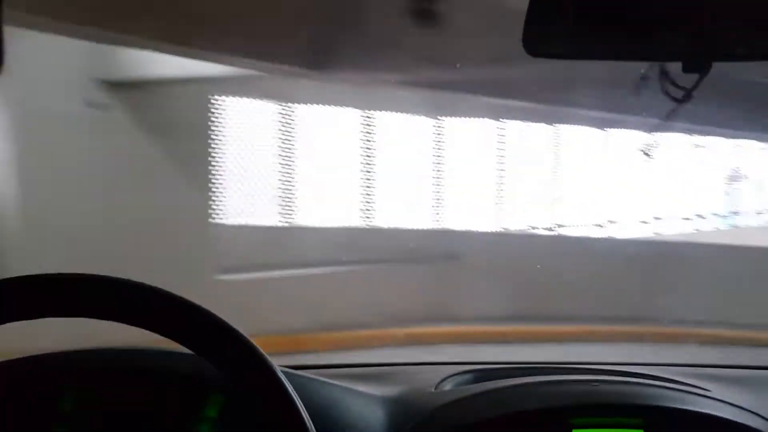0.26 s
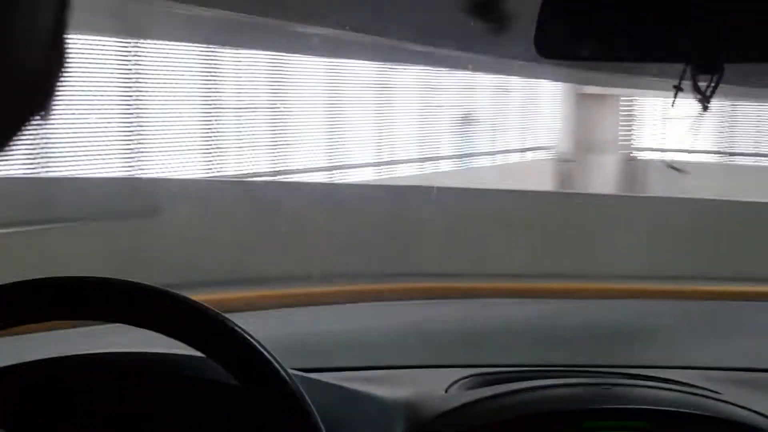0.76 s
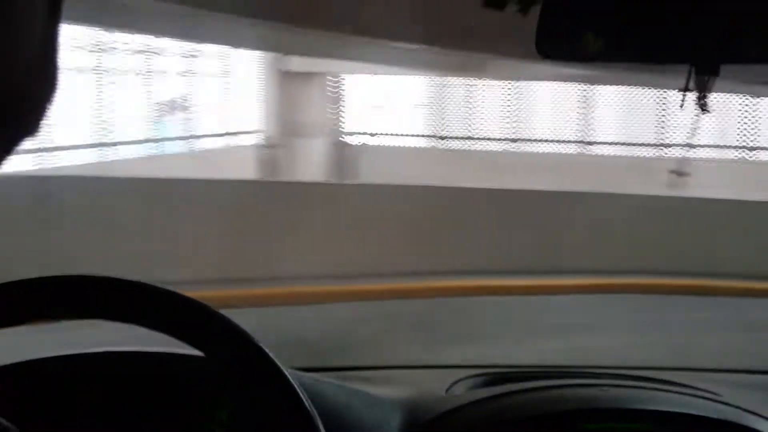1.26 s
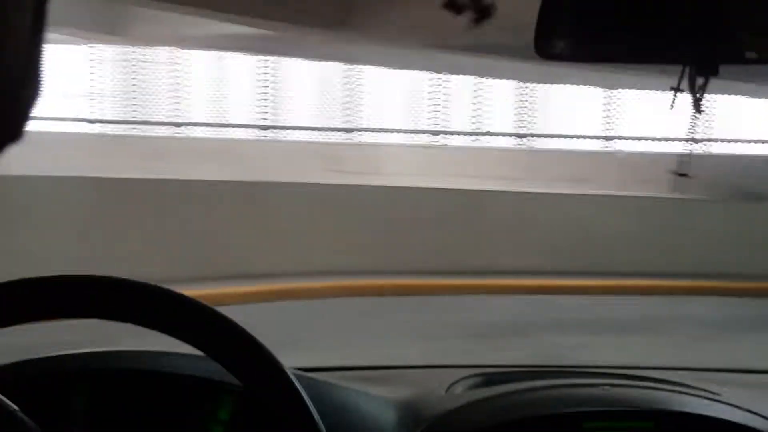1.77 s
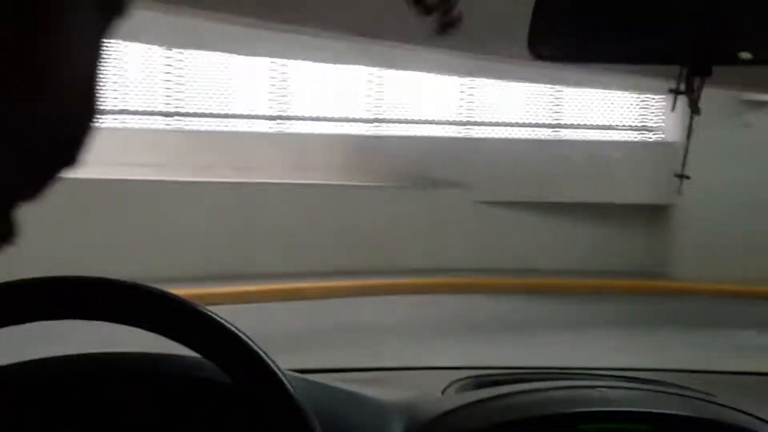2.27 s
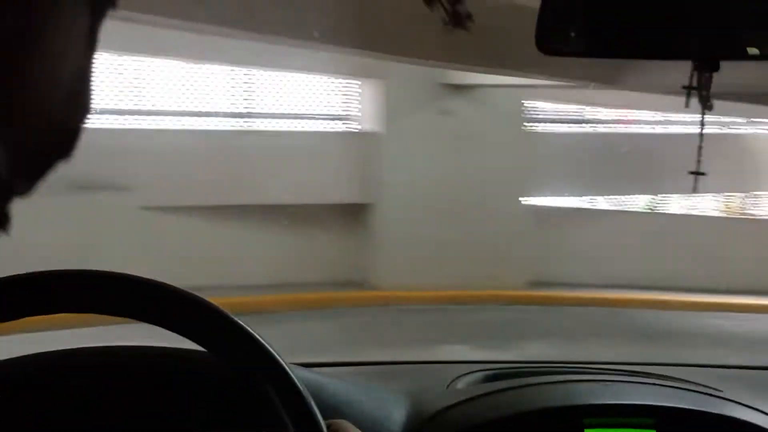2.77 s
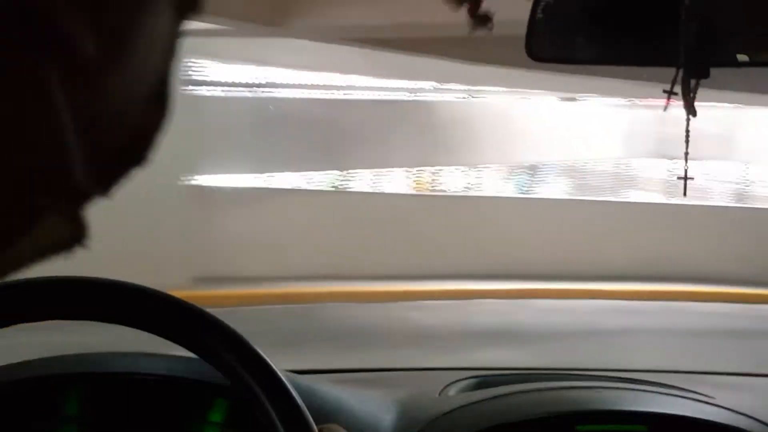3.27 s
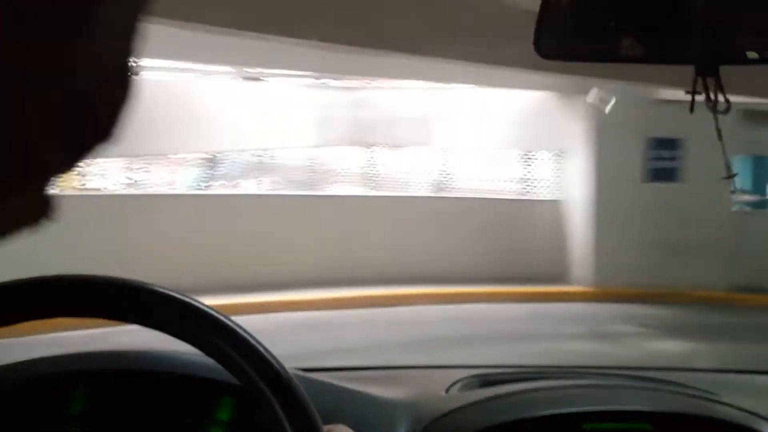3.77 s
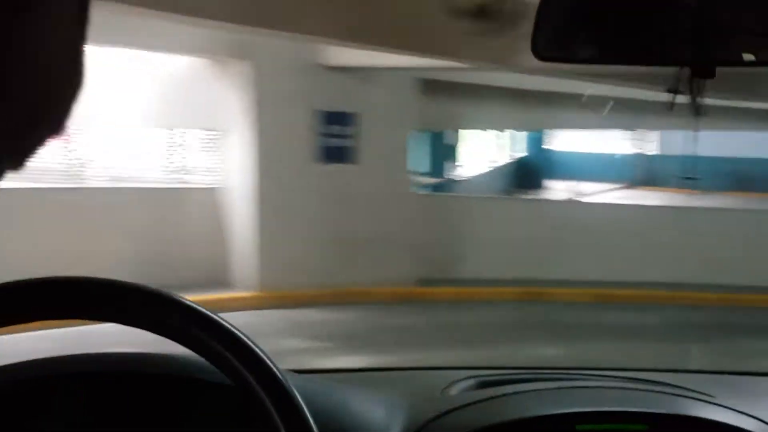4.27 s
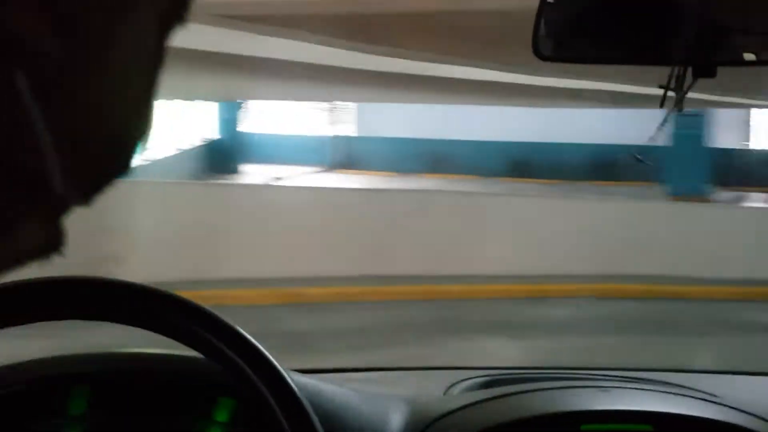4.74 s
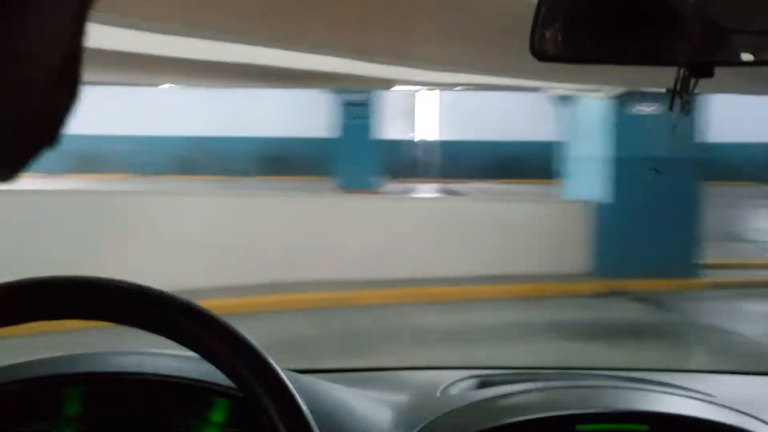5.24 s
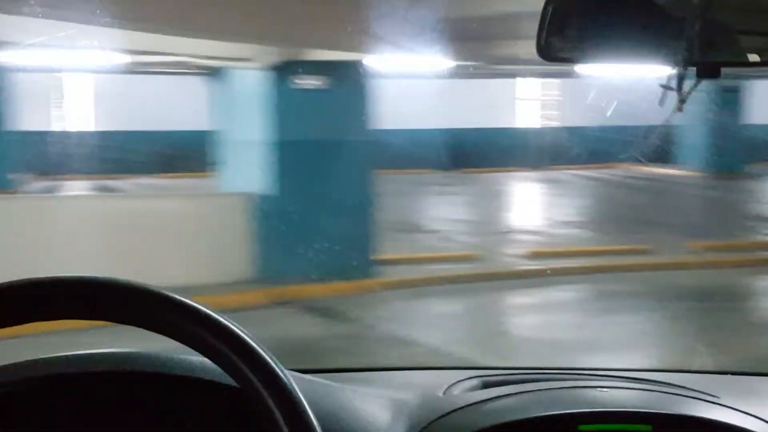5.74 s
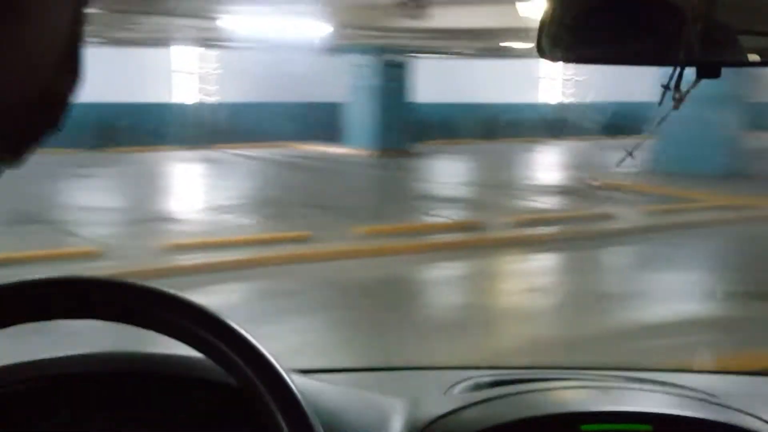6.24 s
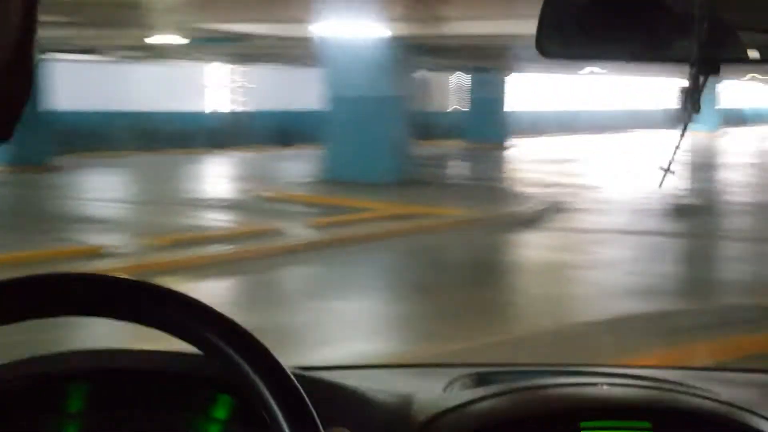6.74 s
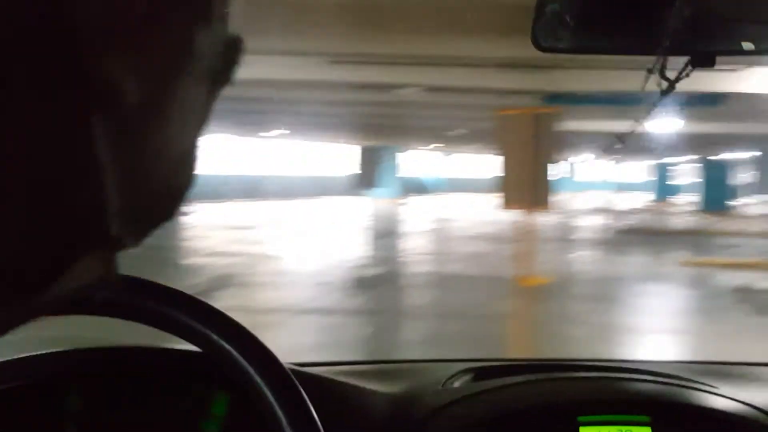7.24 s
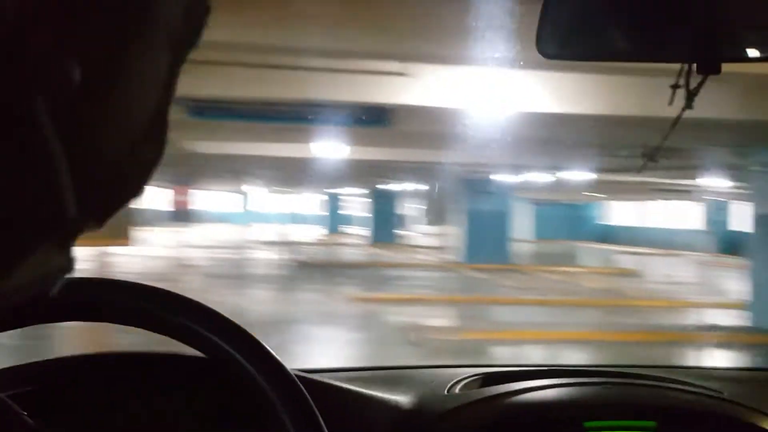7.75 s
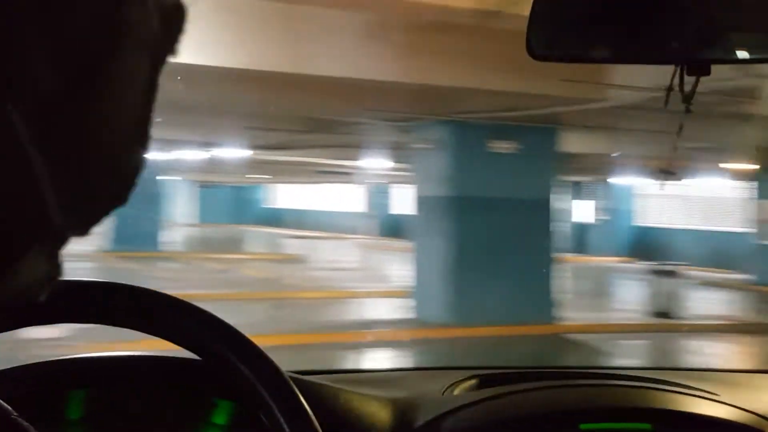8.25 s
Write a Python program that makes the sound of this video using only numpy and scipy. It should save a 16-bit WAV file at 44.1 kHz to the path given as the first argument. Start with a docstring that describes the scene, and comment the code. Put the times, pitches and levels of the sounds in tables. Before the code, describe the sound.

Deep muffled road rumble fills a small car cabin, with floor-joint thuds, tiny pendant ticks, plastic knocks and a brief faint key jingle.

```python
"""Heard from the back seat, a car rolls slowly through a concrete parking garage; its tyres boom throughout.
At first floor joints thud and loose trim knocks; the whine of an engine-driven pump dips soon after.
Then bumps rock the car, a pendant on the mirror ticks, and trim rattles and creaks in the small cabin.
Late on come harder jolts and knocks, and keys jingle; the boom is weakest at the very end.
Noise makes the road, rattles and knocks; sine waves make the engine, low notes and ringing parts."""
import sys
import numpy as np
from scipy import signal
from scipy.fft import rfft, irfft, next_fast_len
from scipy.io import wavfile
from scipy.ndimage import uniform_filter1d

SR = 44100
rng = np.random.default_rng(int(sys.argv[2]) if len(sys.argv) > 2 else 0)


def pcm_store(signal):
    """Save signal as 16-bit PCM."""
    levels = np.round(np.clip(np.atleast_2d(signal), -1, 1) * 32767)
    wavfile.write(sys.argv[1], SR, levels.astype(np.int16).T)


N = 375291
TIME = np.arange(N) / SR
TAIL = TIME[:SR // 2]  # the half second given to each short sound


def undb(db):
    """Turn decibels into gain."""
    return 10 ** (np.asarray(db) / 20)


def unit(x):
    """Scale to rms 1."""
    return x / np.sqrt(np.mean(x ** 2))


def unit_hit(x):
    """Scale a blow to rms 1 over its first fortieth of a second."""
    return x / np.sqrt(np.mean(x[..., :SR // 40] ** 2))


def curves(table):
    """Draw each column of a table, after its times, as a line through every sample."""
    times, *columns = np.transpose(table)
    return [np.interp(TIME, times, column) for column in columns]


def walk(rate):
    """Wander at random: levels held for 1 / rate seconds, smoothed twice and scaled to about rms 1."""
    hold = int(SR / rate)
    steps = np.repeat(rng.standard_normal(N // hold + 1), hold)
    smooth = uniform_filter1d(uniform_filter1d(steps, hold), hold)
    return unit(smooth[:N])


def hump(s, half):
    """Swell smoothly to 1 and back around a time; half is the bell's standard deviation in seconds."""
    return np.exp(-.5 * ((TIME - s) / half) ** 2)


def even(x, span_s=.11):
    """Even out a noise's chance swells, so that the road decides when it surges."""
    power = uniform_filter1d(np.mean(x ** 2, axis=0), int(span_s * SR))
    return unit(x / np.sqrt(power))


def colour(x, points):
    """Filter by a spectrum of (f/Hz, level/dB) points that falls 30 dB an octave beyond its ends."""
    hz, db = np.transpose(points)
    octave = np.log2(np.fft.rfftfreq(x.shape[-1], 1 / SR) + 1)
    known = np.log2(hz)
    beyond = np.abs(octave - np.clip(octave, known[0], known[-1]))
    gain = undb(np.interp(octave, known, db) - 30 * beyond)
    return irfft(rfft(x) * gain, x.shape[-1])


# Directions from which sound reaches the left and right ports
# columns: delay of the left port/ms, level/dB
ARRIVAL_DIRECTIONS = [(0.425, -4.5), (0.254, -3), (0.059, -4), (-0.165, -4), (-0.366, -4.5)]


def cabin_noise(size, apart_db=-14):
    """Make noise from several directions: alike at both ports in the bass, unlike in the treble."""
    n = next_fast_len(size, True)
    hz = np.fft.rfftfreq(n, 1 / SR)
    ports = undb(apart_db) * rfft(rng.standard_normal((2, n)))  # a part that the ports do not share
    for lag_ms, db in ARRIVAL_DIRECTIONS:
        right = undb(db) * rfft(rng.standard_normal(n))
        left = right * np.exp(-2j * np.pi * hz * lag_ms / 1000)
        ports = ports + np.array([left, right])
    return unit(irfft(ports, n))


def rush(points, size=N):
    """Give cabin noise a spectrum and scale it to rms 1."""
    return unit(colour(cabin_noise(size), points)[:, :size])


def fade(t60):
    """Die away by 60 dB in t60 seconds."""
    return np.exp(-np.log(1000) * TAIL / t60)


CABIN_T60_S = 0.19  # how long the cabin takes to die away by 60 dB


def blow(direct, direct_t60):
    """Shape a contact: a quick onset and direct sound, over the cabin's own decay."""
    onset = 1 - np.exp(-TAIL / 0.00044)
    return (fade(CABIN_T60_S) + direct * fade(direct_t60)) * onset


def add(out, s, x):
    """Mix a sound in at a time in seconds."""
    start = int(s * SR)
    first, last = max(start, 0), min(start + x.shape[-1], N)
    out[:, first:last] += x[:, first - start:last - start]


CRACK_T60_S = 0.0088  # extra crack at the start of a struck part


def ringing(strikes, modes, spread_s=0.000253, crack=0, vary_db=0, detune=0):
    """Ring a struck object's modes, each a little apart at the ports, varied at random if asked."""
    out = np.zeros((2, N))
    onset = 1 - np.exp(-TAIL / 0.0004)
    for s, db in strikes:
        ring = 0
        for hz, mode_db, t60 in modes:
            lag = spread_s * rng.uniform(-1.13, 1) * np.array([[1], [-1]])
            weight, shift = rng.standard_normal(2)
            envelope = undb(mode_db + vary_db * weight) * (fade(t60) + crack * fade(CRACK_T60_S))
            cycles = hz * (1 + detune * shift) * (TAIL + lag) + rng.random()
            ring = ring + envelope * np.sin(2 * np.pi * cycles)
        add(out, s, undb(db) * unit_hit(ring * onset))
    return out


# Early reflections off the glass and roof
# columns: delay/s, gain (no unit)
EARLY_REFLECTIONS = [(.0029, .15), (.0047, -.13), (.0079, .13), (.0127, .12)]


def cabin(x):
    """Add close reflections, which overlap the sound and strengthen or weaken fixed pitches."""
    out = x.copy()
    for delay, gain in EARLY_REFLECTIONS:
        add(out, delay, gain * x)
    return out / np.sqrt(1 + sum(gain ** 2 for _, gain in EARLY_REFLECTIONS))


def scuffs(rattle_db, level_db=-8):
    """Rub small trim parts together: three bands of noise that follow the level of the rattle."""
    out = 0
    for hz in (1500, 2100, 3000):
        out = out + rush([(hz / 1.2, 0), (hz * 1.2, 0)])
    return unit(out) * undb(rattle_db + level_db)


# Spectrum of the fine rattle
# columns: f/Hz, level/dB per Hz
RATTLE_SPECTRUM = [(820, 1.5), (1400, -0.5), (1780, -8), (1970, -4.5), (2250, -8), (3260, -7.5),
                   (3570, -12), (5900, -19.5), (7510, -21), (10300, -31), (11300, -33.5), (15500, -27.5)]


def rattle(rattle_db, level_db=1.5, per_second=70, spread_db=3.6, smooth=0.58):
    """Rattle dashboard and doors by many small random contacts, each dying away in the cabin."""
    chance = rng.random(N)
    size = np.minimum(rng.exponential(size=N), 3)
    contacts = (chance < per_second / SR) * undb(spread_db * size)
    power = signal.fftconvolve(contacts ** 2, blow(0.39, 0.0049) ** 2)[:N]
    grain = np.sqrt(smooth + np.abs(power) / power.mean())  # smooth: a steady share between contacts
    return rush(RATTLE_SPECTRUM) * grain * undb(rattle_db + level_db)


# Seats and trim creaking as the body twists
# columns: t/s of the middle, level/dB, centre f/Hz, half length/s
CREAK_TIMES = [(0.162, -49, 2200, 0.023), (0.686, -47, 3100, 0.022), (0.845, -52.5, 2400, 0.013),
               (0.916, -53.5, 2500, .012), (3.577, -56.5, 1970, .02), (4.473, -55.5, 2600, 0.012),
               (4.655, -54, 2800, .015), (5.325, -52.5, 2500, .018), (5.744, -58, 1900, .018),
               (4.588, -57, 1510, .02), (4.799, -58, 2940, 0.011), (4.895, -59, 2370, 0.018),
               (5.83, -52.5, 2080, .02), (5.98, -56, 2050, .02), (6.164, -52.5, 1893, 0.014),
               (6.217, -50.5, 2830, 0.02), (6.67, -46, 2000, 0.023), (6.77, -55, 2605, .02),
               (6.826, -48, 2800, 0.023), (7.381, -50.5, 1880, 0.053), (7.483, -45, 1630, 0.031),
               (7.543, -44, 1500, 0.016), (7.742, -48.5, 2300, .015)]


def creaks(slips_per_second=260, width_octaves=0.33, slip_t60=0.028):
    """Creak by surfaces slipping in quick irregular steps through a broad resonance that swells and fades."""
    out, middle = np.zeros((2, N)), TAIL[-1] / 2
    for s, db, hz, half in CREAK_TIMES:
        slips = (rng.random(len(TAIL)) < slips_per_second / SR) * rng.exponential(size=len(TAIL))
        grain = np.sqrt(np.abs(signal.fftconvolve(slips, fade(slip_t60))[:len(TAIL)]))
        resonance = [(hz * 2 ** (k * width_octaves), -6 * abs(k)) for k in (-2, 0, 2)]
        swell = np.exp(-.5 * ((TAIL - middle) / half) ** 2)
        creak = undb(db) * swell * unit(grain * rush(resonance, size=len(TAIL)))
        add(out, s - middle, creak)
    return out


# Keys swinging together
# columns: t/s, level/dB
KEY_JINGLES = [(6.637, -69), (6.655, -60), (7.322, -59)]
# Notes in the ring of the keys
# columns: f/Hz, level/dB, 60 dB decay/s
KEY_MODES = [(9860, -20, .1), (10950, -17, 0.15), (12710, -7, .17), (13820, -9, .09), (14240, -1, 0.15),
             (14720, -9, .08)]
# Single keys touched lightly, one note each
# columns: t/s, level/dB, f/Hz
KEY_PINGS = [(6.637, -60, 8610), (7.324, -66, 5670), (7.47, -64, 8600)]


def keys(ping_t60_s=.38):
    """Jingle the keys as sets of high, short notes, with longer single pings."""
    out = ringing(KEY_JINGLES, KEY_MODES)
    for s, db, hz in KEY_PINGS:
        out = out + ringing([(s, db)], [(hz, 0, ping_t60_s)])
    return out


# The pendant tapping
# columns: t/s, click level/dB, ring level against the click/dB
PENDANT_TICKS = [(1.315, -65, -12), (1.688, -60.5, 5.5), (2.0183, -71, -7), (2.2939, -63, 4),
                 (2.329, -63, -2), (2.496, -60, 2.5), (2.681, -68, -8), (2.7877, -66, -6),
                 (2.9408, -46.5, 0.5), (3.087, -58.5, 1.5), (3.2227, -55.5, 0), (3.309, -62.5, 7),
                 (3.685, -58.5, 0), (3.761, -62, -5), (5.402, -62, 6.5), (5.529, -63, 1), (5.587, -67, 6),
                 (6.0099, -47.5, -23), (6.043, -60.5, 6), (6.201, -58, 0), (8.353, -70, 5)]
# Spectrum of its click
# columns: f/Hz, level/dB per Hz
CLICK_SPECTRUM = [(1200, -20), (2300, -5), (2950, -1), (3700, -1), (4600, -8), (6100, -9), (7000, -6),
                  (8400, -3), (10000, -15), (15500, -18)]
# Notes in its short ring
# columns: f/Hz, level/dB, 60 dB decay/s
BEAD_MODES = [(2680, 4, 0.02), (2995, 8.5, 0.014), (3080, -7, 0.096), (3670, -9.5, 0.085)]


def pendant(lead_s=0.00117, crack=3.1, crack_t60=.006):
    """Tap small hard beads as the pendant swings: a bright noise click, then a short ring."""
    out = np.zeros((2, N))
    envelope = blow(1.4, 0.091) + crack * fade(crack_t60)
    for s, db, _ in PENDANT_TICKS:
        click = unit_hit(rush(CLICK_SPECTRUM, size=len(TAIL)) * envelope)
        add(out, s - lead_s, undb(db) * click)  # the click leads the ring by lead_s
    rings = [(s, db + bead_db) for s, db, bead_db in PENDANT_TICKS]
    return out + ringing(rings, BEAD_MODES, spread_s=.00004)


# Small loose parts tapping, each at its own pitch
# columns: t/s, level/dB, centre f/Hz
TAP_TIMES = [(.124, -48, 1940), (.175, -49, 1290), (.636, -40, 1050), (.73, -50, 1490), (.784, -48, 1200),
             (2.365, -54, 2500), (3.533, -60, 2200), (3.765, -55.5, 2500), (3.873, -52, 2037),
             (4.014, -51, 1400), (4.19, -57, 1982), (4.283, -56, 1900), (4.6707, -53.5, 2600),
             (4.868, -56, 1900), (4.882, -48, 1150), (5.025, -63, 1700), (5.186, -53, 1610),
             (5.308, -51, 2022), (5.342, -56, 2200), (5.723, -52.5, 1570), (5.775, -54, 2090),
             (5.927, -56, 2900), (6.633, -43, 1600), (6.6432, -42, 1710), (6.655, -47, 4280),
             (6.73, -47.5, 4950), (6.742, -52, 5200), (6.929, -51, 2303), (6.972, -46, 3050),
             (7.12, -48.5, 1390), (7.258, -47, 1920), (7.313, -45, 2000), (7.43, -50, 2330),
             (7.457, -42, 1480), (7.514, -45, 1570), (7.567, -38, 1190), (7.626, -46, 1700),
             (7.724, -49, 2610), (7.846, -55.5, 2003)]


def taps(direct=1.7, direct_t60=0.037, width_octaves=0.51):
    """Hit each small part on its seat once, so that it sounds briefly in one broad resonance."""
    out = np.zeros((2, N))
    shape = ((-1.5, -14), (-.4, -8), (0, 0), (.4, -9), (2, -20))  # (widths from the centre, dB)
    for s, db, hz in TAP_TIMES:
        resonance = [(hz * 2 ** (k * width_octaves), db_down) for k, db_down in shape]
        tap = rush(resonance, size=len(TAIL)) * blow(direct, direct_t60)
        add(out, s, undb(db) * unit_hit(tap))
    return out


# Loose trim panels knocking
# columns: t/s, clack level/dB, body against clack/dB (before body_trim_db), bright edge against clack/dB
TRIM_KNOCKS = [(0.064, -51, -11, -22), (0.1437, -55, 21.5, -28), (0.5832, -50.5, -4, -19),
               (0.6543, -45, -1, -15), (.672, -43.5, 12, -18), (.689, -49, -1, -8), (0.812, -49, 11, -10),
               (0.886, -50.5, 10.5, -8.5), (1.2083, -53, 0, -16), (2.111, -55.5, 10, -23),
               (2.3622, -45.5, 4.5, -16), (2.719, -60, -3, -8), (3.149, -48.5, -12, -14),
               (3.6267, -51.5, 7.5, -10), (3.759, -57, 2, -19), (4.012, -57, 13, -14),
               (5.0408, -52, -12, -13), (5.162, -53, 11, -15), (5.3446, -51, 10, -12),
               (5.4442, -48, 2, -14), (5.964, -54.5, 10, -9), (6.2274, -47, 1.5, -8.5),
               (6.2958, -50, 3, -20), (6.59, -50, 10, -14), (6.7266, -36.5, -3, -18), (6.752, -54, -6, -12),
               (6.81, -47.5, -10, -24), (6.854, -42.5, -2, -8), (6.9705, -46, 11, -14), (7.323, -45, 2, -9),
               (7.4306, -53, 18, -21), (7.576, -32.5, 0, -16.5), (7.712, -50, 10, -8.5),
               (7.7581, -47.5, 12, -14)]
# Spectrum of the trim
# columns: f/Hz, level/dB per Hz
TRIM_SPECTRUM = [(240, -23), (400, -24), (511, 7.5), (663, -11), (972, -3.5), (1150, -6.5), (1540, -9),
                 (1660, -9), (3510, -14), (5310, -27), (8530, -28), (10300, -40.5), (15500, -43)]


def knocks(body_trim_db=-4, edge_direct=0.41, edge_t60=0.023):
    """Knock plastic panels together: noise in three bands (body, clack, edge), each with its own decay."""
    out = np.zeros((2, N))
    envelopes = blow(0.36, 0.011), blow(0.66, 0.0067), blow(edge_direct, edge_t60)
    bands_hz = (600, 1500), (1500, 5500), (5500, 16000)
    filters = [signal.butter(3, band, "bandpass", fs=SR, output="sos") for band in bands_hz]
    for s, clack_db, body_db, edge_db in TRIM_KNOCKS:
        crack = rush(TRIM_SPECTRUM, size=len(TAIL))
        gains = undb(clack_db) * undb([body_db + body_trim_db, 0, edge_db])
        knock = 0
        for gain, sos, envelope in zip(gains, filters, envelopes):
            knock = knock + gain * unit_hit(signal.sosfilt(sos, crack * envelope))
        add(out, s, knock)
    return out


# A stiff fitting ringing
# columns: t/s, level/dB
FITTING_CLACKS = [(.655, -51), (.676, -50), (6.7289, -40), (6.855, -43), (7.5772, -35)]
# Notes in its ring
# columns: f/Hz, level/dB, 60 dB decay/s
FITTING_MODES = [(1330, 5, .08), (2020, 1, .08), (2870, -2.5, 0.072), (3250, 4, 0.072), (3720, -1, 0.056),
                 (4080, -8, .09), (4830, -12, .1)]


def stiff_fitting():
    """Strike a stiff fitting: a strong crack and high, short modes."""
    return ringing(FITTING_CLACKS, FITTING_MODES, crack=3.6, vary_db=3.5, detune=.02)


# A hollow panel struck
# columns: t/s, level/dB
PANEL_CLONKS = [(.1425, -33), (.633, -48), (.671, -42), (6.966, -32.5), (7.58, -41)]
# Notes in its ring
# columns: f/Hz, level/dB, 60 dB decay/s
PANEL_MODES = [(590, 0, .19), (715, -2, .13), (770, -3, .12), (850, -3, .11), (940, -7, .1),
               (1360, -10, .12), (2090, -15, .14), (2540, -16, .14), (3070, -13, .08)]


def hollow_panel():
    """Strike a hollow panel: a crack and a cluster of ringing modes."""
    return ringing(PANEL_CLONKS, PANEL_MODES, crack=0.87, vary_db=1.5, detune=0.007)


# The suspension bottoming into the body shell
# columns: t/s, level/dB
SHELL_CLUNKS = [(.652, -36), (.679, -32.5), (.699, -43), (2.36, -44), (3.52, -43), (5.985, -40),
                (6.856, -38), (6.885, -46), (7.313, -45)]
# Notes in the shell's ring
# columns: f/Hz, level/dB, 60 dB decay/s
SHELL_MODES = [(315, -5, .1), (385, 0, .14), (440, -4, .1), (550, -5, .1), (660, -7, .08)]


def body_shell():
    """Clunk the suspension into the body shell, which rings with low modes."""
    return ringing(SHELL_CLUNKS, SHELL_MODES, crack=0.8, vary_db=1.5, detune=.02)


# Jolts through the suspension
# columns: t/s, thud level/dB, clatter level/dB, half length/s
JOINT_JOLTS = [(0.143, -28, -39.5, 0.01), (0.632, -27, -43, 0.019), (0.68, -27.5, -36, 0.017),
               (0.75, -26.5, -47.5, 0.041), (4.057, -25, -56, 0.026), (6.008, -37, -47, 0.032),
               (6.667, -31.5, -38.5, 0.035), (6.862, -33, -40.5, 0.014), (7.323, -47, -40, 0.01),
               (7.423, -28.5, -48, 0.016), (7.5, -52, -46, 0.11), (7.595, -34, -48, 0.028)]
# Spectrum of the body's thud
# columns: f/Hz, level/dB per Hz
THUD_SPECTRUM = [(20, -11), (42, 5), (80, -1.5), (150, 0), (220, -5), (290, -14.5), (420, -21)]
# Spectrum of the clatter
# columns: f/Hz, level/dB per Hz
CLATTER_SPECTRUM = [(230, -12), (310, 1), (390, 3), (460, -2.5), (550, -5.5), (680, -3.5), (950, -3.5),
                    (1400, -6.5), (1700, -13), (3400, -17.5), (6200, -34.5), (8400, -29.5), (10000, -45),
                    (15000, -45)]


def jolts(grain_db=1.5):
    """Cross floor joints: noise swells as the body thuds and loose things clatter at once."""
    thud, clatter = 0, 0
    for s, thud_db, clatter_db, half in JOINT_JOLTS:
        push = hump(s, half)
        thud = thud + undb(thud_db) * push
        clatter = clatter + undb(clatter_db) * push
    grain = undb(grain_db * walk(250))
    return rush(THUD_SPECTRUM) * thud + rush(CLATTER_SPECTRUM) * clatter * grain


# The pump follows the engine speed and slackens once
# columns: t/s, whine f/Hz (before its wobble), level/dB of the whole engine before the orders' own levels
PUMP_COURSE = [(0, 488.7, -51), (.14, 491, -47.5), (.24, 487.4, -56.5), (.7, 490, -52), (.92, 486.5, -59),
               (1.12, 489.5, -70), (1.3, 490, -49), (2.4, 493.3, -48.5), (2.6, 496.6, -51.5),
               (3.3, 491.5, -49.5), (4.25, 495, -48), (4.85, 491, -51), (5.1, 488, -50.5),
               (5.4, 487, -51.5), (5.7, 488.2, -51), (6.15, 501.3, -50), (7.3, 492.2, -49.5),
               (7.9, 494, -48), (8.51, 494.7, -47)]
# Engine orders; the pump's whine is the tenth
# columns: multiple of the firing rate (no unit), level/dB (the lowest three before the load)
ENGINE_ORDERS = [(1, 3.5), (2, -19.5), (3, -12.5), (8, -15.5), (10, -1)]
WHINE_WOBBLE, WHINE_THROB_DB = .0055, 2.2  # random spread of pitch (a fraction) and of level
BELT_DB, BELT_RATIO = -10.5, 1.212  # faster pulley: level against the pump course, speed against the pump
BELT_SLIP = 1.3  # radians by which the pulley's whine wanders on its belt
FIRING_FOLLOWS = 0.74  # dB that the lowest orders gain per dB of boom, as the load grows


def engine(effort_db):
    """Add sines locked to the firing rate, the pump's whine among them, and a pulley's wavering whine."""
    pump_hz, pump_db = curves(PUMP_COURSE)
    firing_hz = pump_hz * (1 + WHINE_WOBBLE * walk(24.85)) / 10
    phase = 2 * np.pi * np.cumsum(firing_hz) / SR
    belt_gain = undb(BELT_DB + WHINE_THROB_DB * walk(20))
    out = belt_gain * np.sin(10 * BELT_RATIO * phase + BELT_SLIP * walk(20))
    for order, db in ENGINE_ORDERS:
        load_db = FIRING_FOLLOWS * effort_db * (order < 5)
        out = out + undb(db + load_db + WHINE_THROB_DB * walk(20)) * np.sin(round(order) * phase)
    return np.sqrt(2) * out * undb(pump_db)


# Low cabin resonances swelling
# columns: t/s, level/dB, f/Hz, half length/s
CABIN_DRONES = [(0.425, -44.5, 135, 0.22), (1.047, -36.5, 140, 0.058), (1.5, -42, 136, 0.17),
                (1.954, -37.5, 182, 0.15), (2.23, -35, 138, 0.17), (2.885, -30, 141, 0.079),
                (3.155, -37.5, 158, 0.08), (3.552, -41, 142, 0.089), (4.225, -39, 160, 0.077),
                (5.327, -36, 140, 0.11), (5.809, -35.5, 160, 0.052), (6.626, -39, 142, 0.067),
                (7.45, -33, 148, 0.085), (7.696, -41, 161, 0.086), (8.049, -55, 135, .15),
                (8.25, -48.5, 182, .15)]


def droning(wander=0.0253, throb_db=3.5):
    """Let the air in the cabin take up low notes, sines that waver, swell and die away."""
    out = 0
    for s, db, hz, half in CABIN_DRONES:
        phase = 2 * np.pi * np.cumsum(hz * (1 + wander * walk(25))) / SR
        out = out + undb(db) * hump(s, half) * np.sin(phase)
    return np.sqrt(2) * out * undb(throb_db * walk(20))


# Uneven patches of floor rocking the car
# columns: t/s, rumble level/dB, shudder level/dB, half length/s
FLOOR_BUMPS = [(0.068, -56, -44, 0.064), (1.478, -34.5, -34.5, 0.19), (1.866, -36, -37, 0.12),
               (2.143, -38, -33, 0.034), (2.415, -29.5, -31, 0.089), (2.82, -31.5, -32.5, 0.14),
               (3.373, -54, -37, 0.13), (3.663, -44, -32, 0.097), (4.056, -36, -31.5, 0.037),
               (4.306, -36, -32, 0.063), (4.6, -50, -36, 0.1), (4.95, -50, -36, 0.058),
               (5.317, -32, -52, 0.048), (5.705, -39.5, -41, 0.16), (6.096, -34, -34, 0.049),
               (6.462, -34.5, -41.5, 0.086), (6.69, -43, -53, 0.025), (6.936, -33, -40, 0.055),
               (7.383, -27.5, -37, 0.081), (7.64, -32.5, -38.5, 0.09)]
# Spectrum of the deep rumble
# columns: f/Hz, level/dB per Hz
RUMBLE_SPECTRUM = [(12, -8.5), (23, 2), (33, -13), (45, -3.5), (58, -8)]
# Spectrum of a tyre's shudder over a bump
# columns: f/Hz, level/dB per Hz
SHUDDER_SPECTRUM = [(55, -13), (78, -2.5), (100, -3.5), (120, -6)]
# Spectrum of the body's boom
# columns: f/Hz, level/dB per Hz
BOOM_SPECTRUM = [(70, -4), (85, 0), (115, -5.5), (140, -2.5), (165, -3), (195, -5), (225, -4.5), (255, -15),
                 (310, -17), (350, -22), (420, -25)]
# Spectrum of the tread's roar
# columns: f/Hz, level/dB per Hz
ROAR_SPECTRUM = [(250, -3), (345, -10), (385, -5.5), (415, -11), (478, -2), (520, -6), (590, -6.5),
                 (680, -14.5), (960, -12), (1400, -19.5), (2200, -30.5)]
# rumble and roar: their levels at the usual boom level, and the dB each gains per dB of boom
USUAL_BOOM_DB, RUMBLE_DB, ROAR_DB = -38, -42, -45.5
RUMBLE_FOLLOWS, ROAR_FOLLOWS = 0.33, 0.49
BUMP_ROAR_DB = -20  # what a bump adds to the roar, against its rumble


def tyres(effort_db, flutter_db=2.0, rumble_lurch_db=1.5, boom_lurch_db=3.0, bump_boom_db=-5):
    """Shake suspension and body with rough concrete: noise bands for rumble, shudder, boom and tread roar."""
    rocking = sum(undb(db) * hump(s, half) for s, db, _, half in FLOOR_BUMPS)
    shaking = sum(undb(db) * hump(s, half) for s, _, db, half in FLOOR_BUMPS)
    rumble_gain = undb(RUMBLE_DB + RUMBLE_FOLLOWS * effort_db + rumble_lurch_db * walk(16))
    boom_gain = undb(USUAL_BOOM_DB + effort_db + boom_lurch_db * walk(24))
    roar_gain = undb(ROAR_DB + ROAR_FOLLOWS * effort_db + flutter_db * walk(26))
    # hypot adds the power of the bumps to the power of the steady road
    rumble = even(rush(RUMBLE_SPECTRUM)) * np.hypot(rumble_gain, rocking)
    shudder = even(rush(SHUDDER_SPECTRUM)) * shaking
    boom = even(rush(BOOM_SPECTRUM)) * np.hypot(boom_gain, shaking * undb(bump_boom_db))
    roar = rush(ROAR_SPECTRUM) * np.hypot(roar_gain, rocking * undb(BUMP_ROAR_DB))
    return rumble + shudder + boom + roar


# How hard the road drives the tyres, lowest at the end as the car eases off
# columns: t/s, body boom level/dB (before its random lurches and the bumps)
ROAD_COURSE = [(0, -34.5), (.4, -36), (.55, -39), (.98, -37), (1.16, -41), (1.35, -35.5), (2.2, -36),
               (2.6, -38), (3.1, -35.5), (3.9, -37.5), (4.3, -37), (4.78, -37.5), (5.15, -35.5),
               (5.55, -35.5), (6.5, -33.5), (7.2, -35), (7.65, -35), (8.03, -39), (8.3, -39.5), (8.51, -43)]
# How strong the fine rattle and the scuffs are
# columns: t/s, level/dB (before each one's own level_db)
RATTLE_COURSE = [(0.0, -52), (0.23, -61.5), (0.62, -63.5), (0.76, -53), (1.07, -60.5), (2.4, -60),
                 (2.85, -61), (3.25, -61), (3.55, -56), (4.0, -59), (4.38, -58.5), (4.88, -56.5),
                 (5.4, -59.5), (6.63, -59.5), (6.8, -48.5), (7.06, -56.5), (7.3, -55.5), (7.54, -56.5),
                 (7.91, -60), (8.51, -60.5)]


def scene():
    """Fill the car with the drone and set the loose things sounding all around."""
    road_db, = curves(ROAD_COURSE)
    rattle_db, = curves(RATTLE_COURSE)
    effort_db = road_db - USUAL_BOOM_DB
    loose = cabin(rattle(rattle_db) + scuffs(rattle_db) + knocks() + taps() + creaks() + pendant())
    struck = hollow_panel() + stiff_fitting()
    chassis = jolts() + body_shell()
    drone = tyres(effort_db) + droning() + engine(effort_db)
    return drone + chassis + loose + struck + keys()


# The left port's colour against the right's
# columns: f/Hz, level/dB
PORT_COLOUR = [(30, -1), (125, 3), (250, 1), (500, 1.5), (1000, 1.1), (2000, -2.5), (4000, 2.5), (8000, -2),
               (12000, -1)]
TOP_HZ = 15850


def record(dry, hiss_db=-77):
    """Give each port its own colour, add the microphone's faint hiss and cut the sound above TOP_HZ."""
    hz, db = np.transpose(PORT_COLOUR)
    lean_db = np.interp(np.log(np.fft.rfftfreq(N, 1 / SR) + 1), np.log(hz), db)
    port_gains = undb(np.array([lean_db, -lean_db]) / 2)  # half the contrast on each side
    heard = irfft(rfft(dry) * port_gains, N)
    hiss = undb(hiss_db) * rng.standard_normal(dry.shape)
    top_cut = signal.ellip(10, .2, 70, TOP_HZ, fs=SR, output="sos")
    return signal.sosfilt(top_cut, heard + hiss)


dry = scene()
out = record(dry)
pcm_store(out)
```